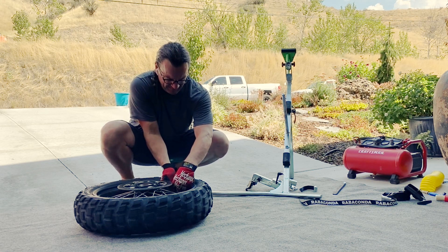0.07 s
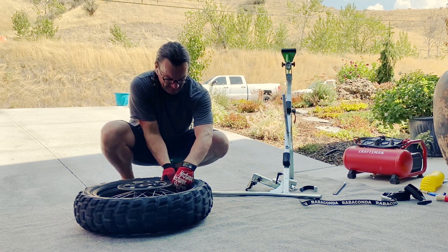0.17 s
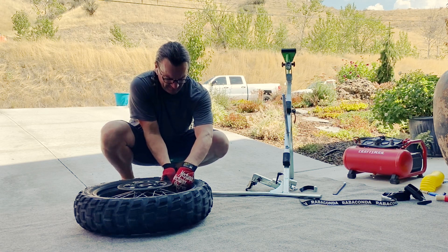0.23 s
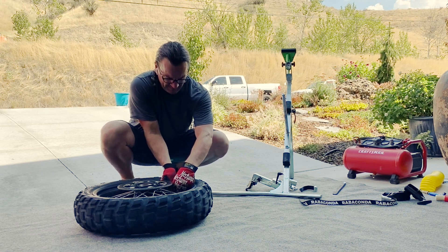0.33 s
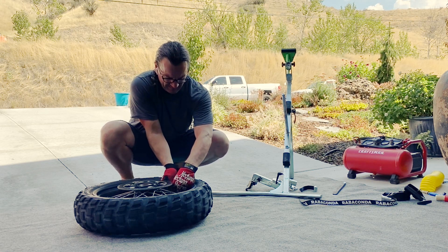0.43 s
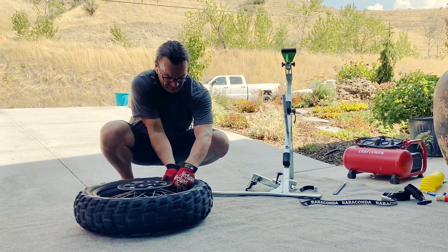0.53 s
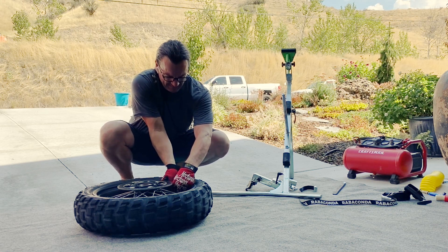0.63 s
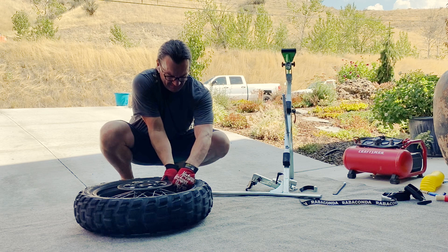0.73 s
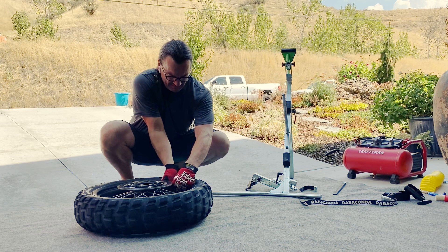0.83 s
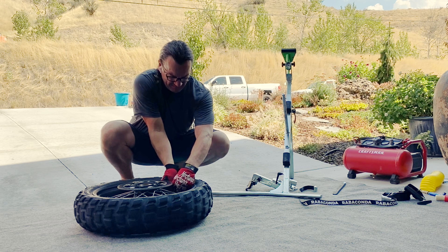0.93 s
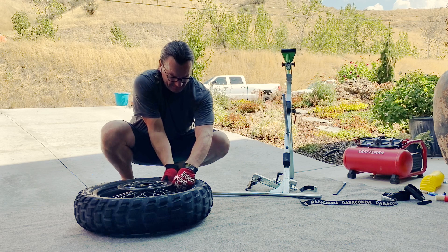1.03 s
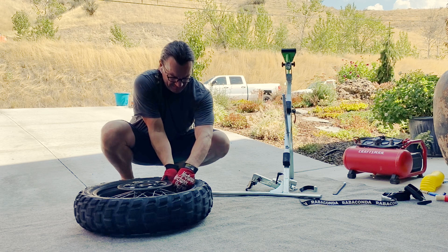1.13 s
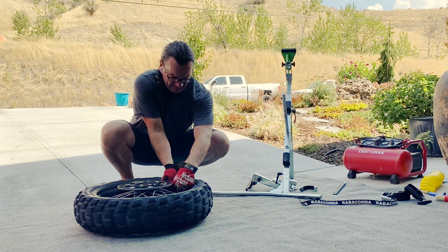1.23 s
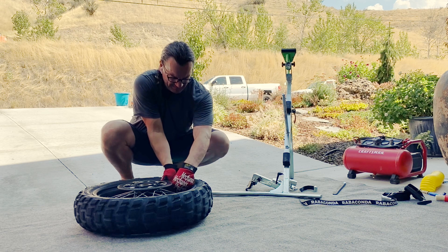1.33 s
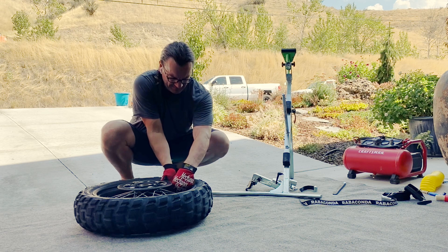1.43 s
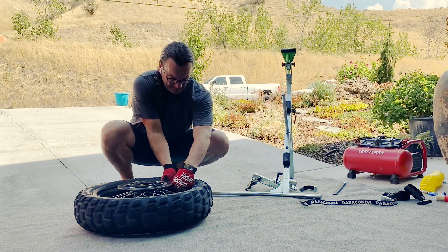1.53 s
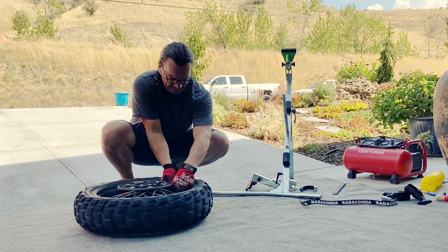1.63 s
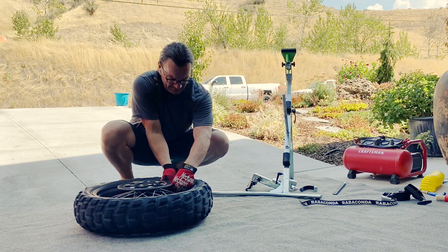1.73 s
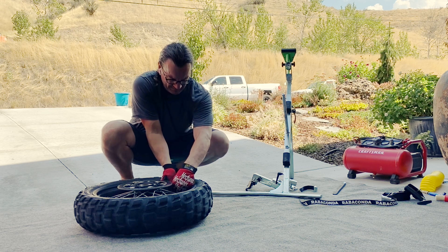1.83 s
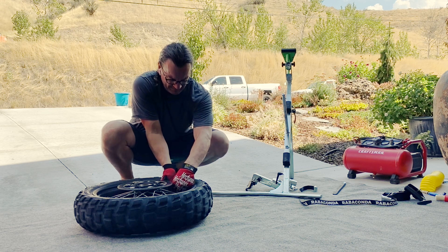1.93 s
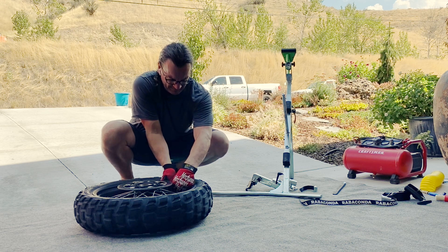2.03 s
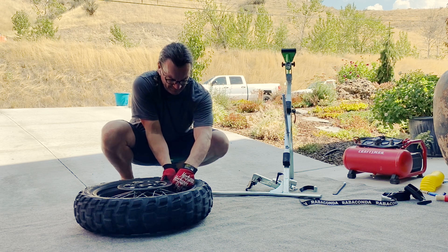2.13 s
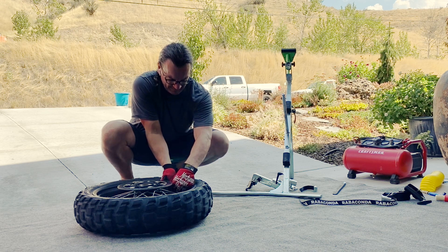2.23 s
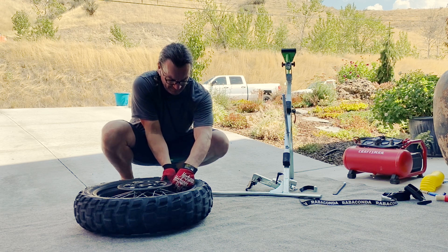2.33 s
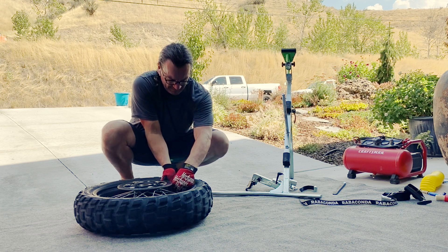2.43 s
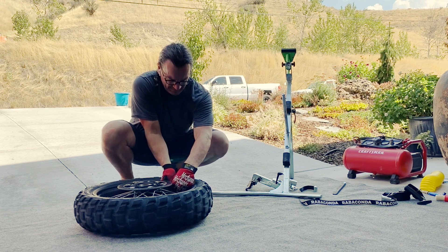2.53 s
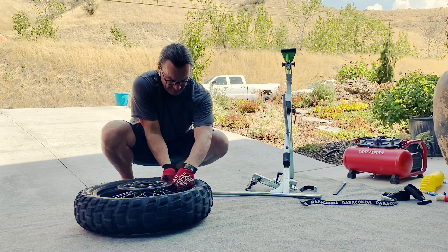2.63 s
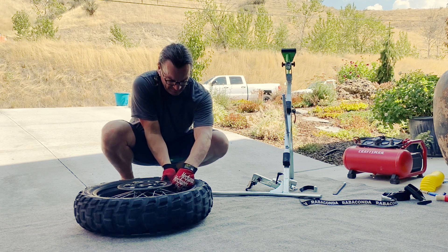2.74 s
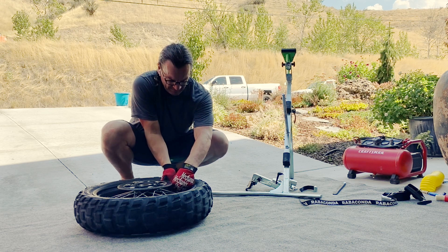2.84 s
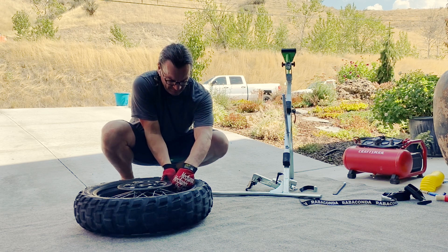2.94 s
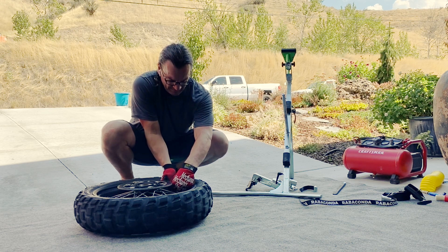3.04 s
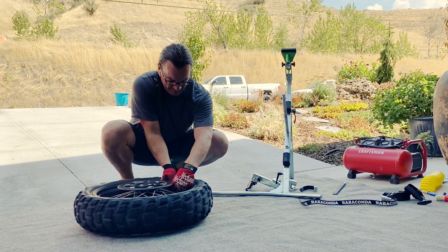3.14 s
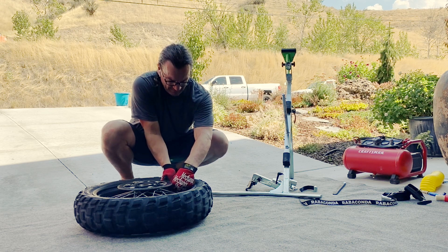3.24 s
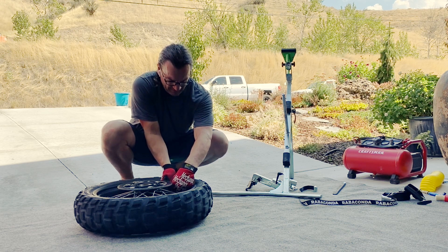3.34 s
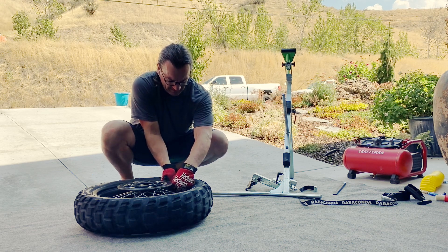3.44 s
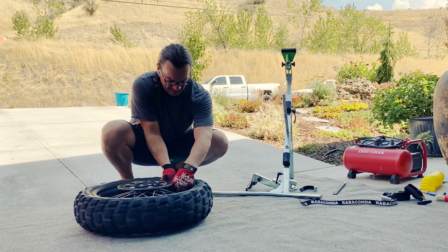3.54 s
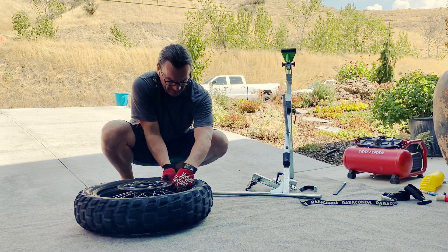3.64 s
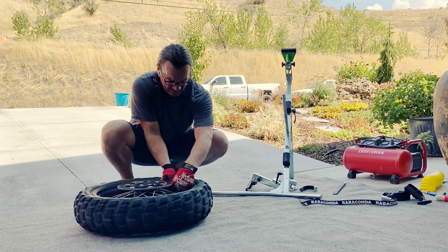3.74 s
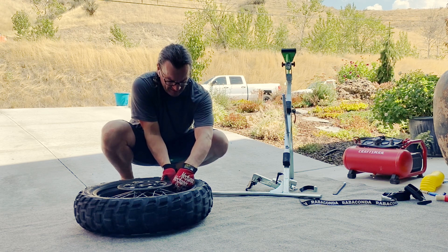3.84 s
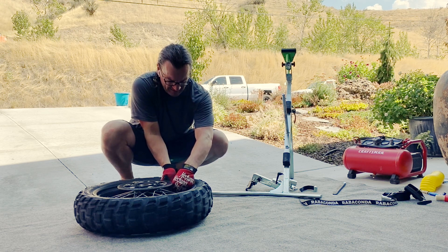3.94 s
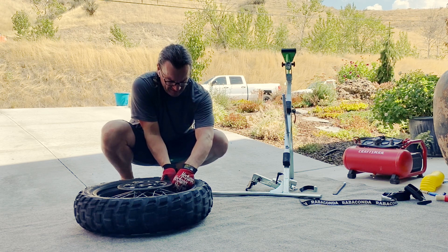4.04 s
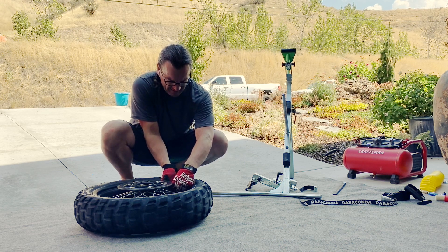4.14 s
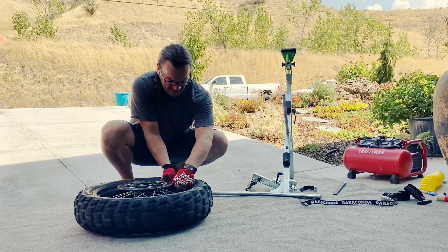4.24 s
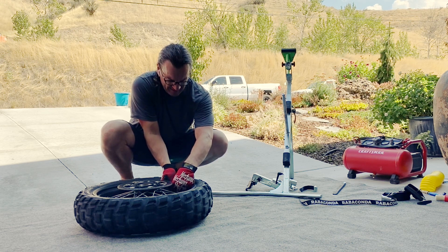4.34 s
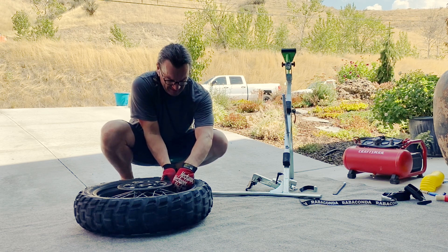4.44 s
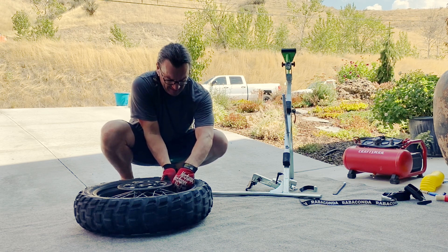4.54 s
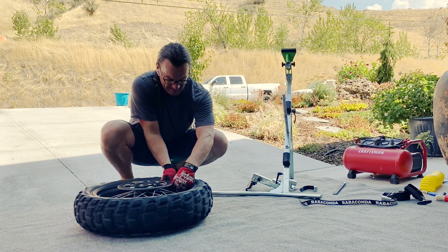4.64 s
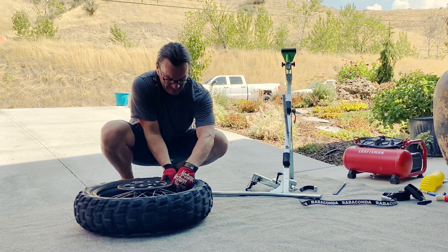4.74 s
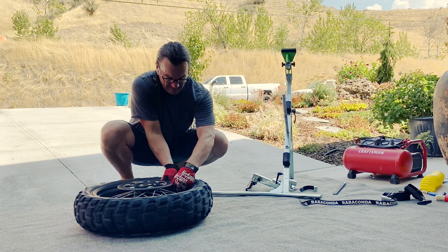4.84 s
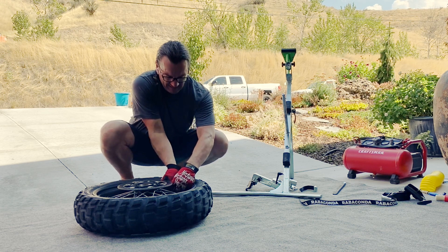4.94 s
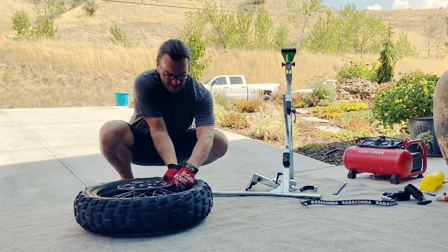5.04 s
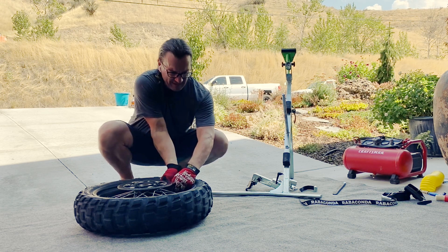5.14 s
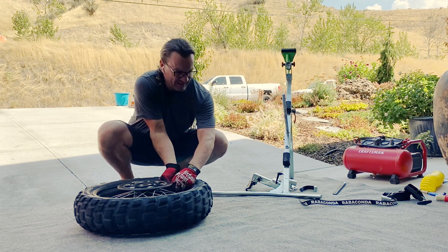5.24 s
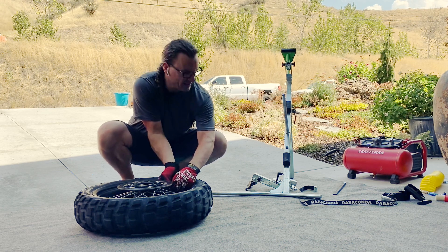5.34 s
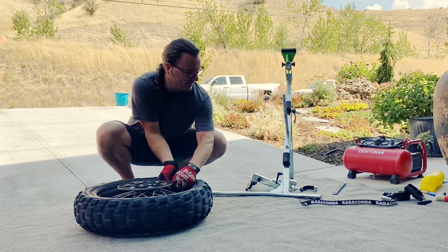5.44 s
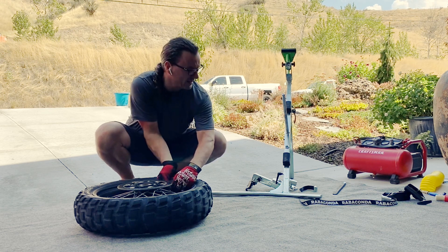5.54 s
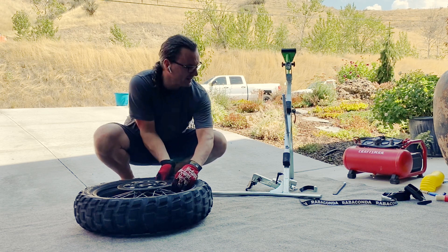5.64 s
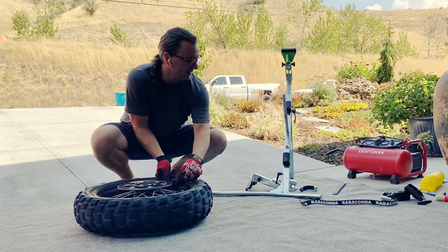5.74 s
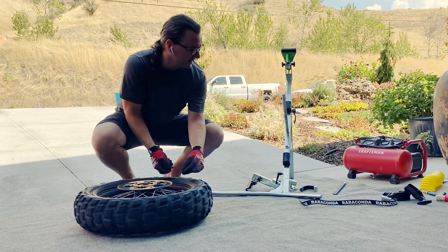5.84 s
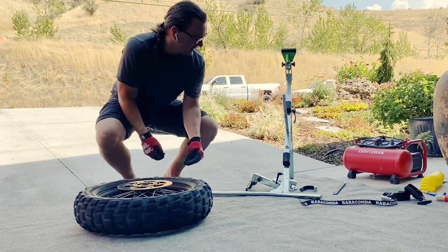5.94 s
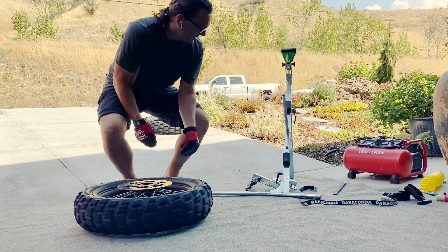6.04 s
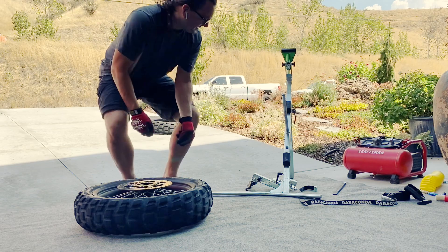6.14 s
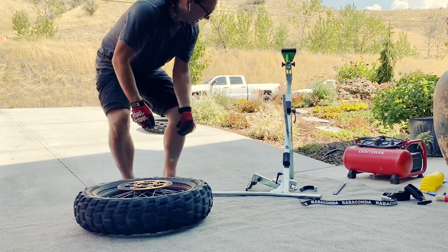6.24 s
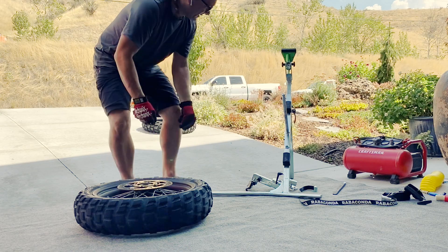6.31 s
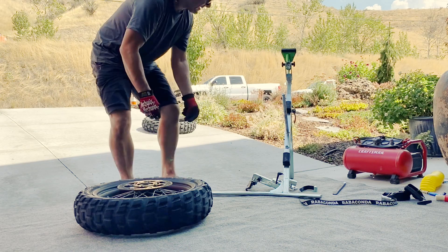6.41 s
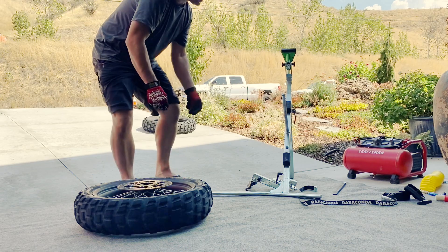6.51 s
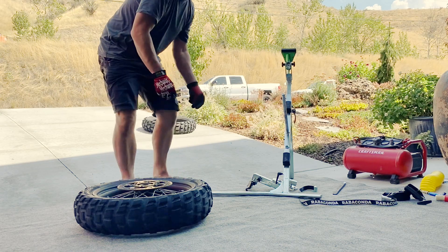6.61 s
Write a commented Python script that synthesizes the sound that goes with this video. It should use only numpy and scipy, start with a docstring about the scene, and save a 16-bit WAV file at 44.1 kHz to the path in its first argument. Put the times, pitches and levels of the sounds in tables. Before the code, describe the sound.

A quiet outdoor driveway, close stereo perspective: soft low air rumble and a faint distant engine droning around 65 to 75 hertz, rising and fading. From 0 to 1.5 seconds a very thin, high hiss seeps from a tire valve, with one tiny click near 0.7. Faint breathy surges follow between 1.6 and 3.5, some with a very high, airy whistle. Small tool clicks with short, dull metallic rings fall at about 2.6, 3.0, 3.5, 3.7 and 3.9. From 3.9 the puffs strengthen, with crisp spurts at 4.3, 4.6 and 4.75. A soft, low knock comes at 4.9 as the hiss swells quickly. After 5.1 a hollow roar joins, and around 5.4 the air blasts out at its loudest, bright and full. By 5.7 it eases to a strong, steady, slightly fluttering rush, continuing until the end at 6.7, with short reflections from concrete and garage walls.

```python
"""Air escapes from a motorcycle tire as the valve core is screwed out on a driveway, before an open garage.
It seeps past the thread, then spurts, then blows freely: shaped noise in three sizes of eddy, with a whistle.
A hollow roar of resonant noise joins from the open stem; tool clicks are noise bursts and ringing rim modes.
Outdoor air is soft noise. A close microphone pair spreads all this left and right.
An engine drones far away, two sines alike on both sides."""
import sys
import numpy as np
from scipy import signal
from scipy.fft import rfft, irfft, next_fast_len
from scipy.io import wavfile

SR = 44100
rng = np.random.default_rng(int(sys.argv[2]) if len(sys.argv) > 2 else 0)


def wrap_up_sound(samples):
    """Save the sound to the file named by the first command line argument, as 16-bit audio."""
    columns = np.atleast_2d(samples).T
    # keep every value between -1 and 1, then stretch to whole-number steps
    tamed = np.clip(columns, -1, 1)
    steps = np.round(tamed * 32767).astype(np.int16)
    wavfile.write(sys.argv[1], SR, steps)


N = 294147
TIME = np.arange(N) / SR
SIZE = next_fast_len(N + SR)
HZ = np.maximum(np.arange(SIZE // 2 + 1) * SR / SIZE, 1)


def from_db(db):
    """Decibels to gain."""
    return 10 ** (np.asarray(db) / 20)


def in_time(rows):
    """Every column of a time curve, interpolated at each sample."""
    s, *columns = np.transpose(rows)
    return [np.interp(TIME, s, column) for column in columns]


def over_hz(points):
    """A frequency curve, interpolated over log frequency."""
    hz, value = np.transpose(points)
    return np.interp(np.log(HZ), np.log(hz), value)


def peak_power(peaks):
    """Summed power response of a set of resonances."""
    return sum(from_db(db) ** 2 / (1 + (2 * (HZ - hz) / width) ** 2) for hz, width, db in peaks)


def resonant(peaks):
    """Gain of resonances standing out of a flat background."""
    return np.sqrt(1 + peak_power(peaks))


def below(edge_hz, order):
    """Share of power that a low-pass lets through."""
    return 1 / (1 + (HZ / edge_hz) ** (2 * order))


def noise(gain, band=(0, SR), count=3):
    """Coloured noise, rms 1 within the band; rows: direct, scattered to the left, to the right."""
    inside = (HZ >= band[0]) & (HZ <= band[1])
    band_rms = np.sqrt(np.mean((gain * inside) ** 2))
    white = rng.standard_normal((count, SIZE))
    return irfft(rfft(white) * gain / band_rms, SIZE)[:, :N]


def drift(rate_hz):
    """Slow random wander of rms 1."""
    return noise(1 / (1 + (HZ / rate_hz) ** 2), count=1)[0]


# colour of the outdoor air: pitch_hz [Hz], level_db [dB per Hz, relative]
AIR_COLOUR = [(20, -27), (34, -4), (55, -4.5), (110, -3), (170, -8.5), (260, -11), (500, -18), (1000, -29),
              (2500, -39), (12000, -45)]


def outdoor_air(level_db=-64.5):
    """Steady soft noise, strongest in the lows."""
    return from_db(level_db) * noise(from_db(over_hz(AIR_COLOUR)))


# speed of the distant engine: start_s [s], pitch_hz [firings per second, before the wander]
ENGINE_PITCH = [(0, 63.3), (1.3, 63.5), (1.7, 68), (3.6, 67.9), (4.1, 74.1), (6.67, 67.2)]
# its drone comes and goes: start_s [s], level_db [dB, before trim and waver]
ENGINE_LEVEL = [(0, -52), (.75, -63.5), (1.9, -60.5), (2.85, -66.5), (3.05, -72), (4.02, -68),
                (4.11, -56.5), (4.45, -64.5), (6.67, -62)]


def engine(trim_db=-0.1, waver_db=2.6, wander_hz=0.57, octave_db=-13):
    """Only the firing note and its octave carry this far; pitch and level wander."""
    (hz,), (level_db,) = in_time(ENGINE_PITCH), in_time(ENGINE_LEVEL)
    phase = 2 * np.pi * np.cumsum(hz + wander_hz * drift(8.3)) / SR
    drone = np.sin(phase) + from_db(octave_db) * np.sin(2 * phase)
    # sqrt(2) gives the firing note rms 1
    return np.sqrt(2) * from_db(level_db + trim_db + waver_db * drift(7.9)) * drone


def reflections(first_s=0.00315, t60_s=0.12):
    """Response of a short, dense train of echoes from concrete and garage walls; power 1."""
    t = TIME[:SR // 2]
    echoes = rng.standard_normal(len(t)) * from_db(-60 * t / t60_s) * (t > first_s)
    return rfft(echoes / np.linalg.norm(echoes), SIZE)


def scatter(x):
    """A sound with its echoes from the left and from the right."""
    sides = np.array([reflections(), reflections()])
    return np.array([x, *irfft(rfft(x, SIZE) * sides, SIZE)[:, :N]])


# tool clicks on the valve, the last row a dull thud of the tire: start_s [s], level_db [dB, before trims],
# bright_hz [Hz, softening edge]
CLICKS = [(0.659, -52.5, 1200), (2.613, -40, 600), (2.617, -54, 885), (2.957, -38.5, 6000),
          (2.9604, -41, 3030), (2.964, -47, 3000), (3.468, -38, 3000), (3.472, -34, 1500),
          (3.475, -34, 700), (3.672, -43, 600), (3.867, -34, 800), (4.926, -23, 90)]
# ring of the stem in the rim: pitch_hz [Hz], level_db [dB re click], t60_s [s]
RIM_MODES = [(95, -19, 0.099), (174, -18.5, 0.12), (300, -18, 0.048), (414, -3, 0.017), (553, -7, 0.033),
             (875, -10.5, 0.031), (1160, -5, 0.015), (1410, -10, 0.0093), (2210, -9, 0.015),
             (2770, -7, 0.02), (3370, -1, 0.0057), (4280, -6, .012)]


def tool(ring_db=-3.5, scatter_db=2.0, crack_db=-3, crack_s=0.0028):
    """Each slip gives a dry noise crack and knocks the rim's modes; soft contacts weaken the highs."""
    start_s, click_db, bright_hz = np.transpose(CLICKS)
    ring = np.zeros(N)
    for k, (hz, mode_db, t60_s) in enumerate(RIM_MODES):
        # each click strikes each mode a little differently
        knock_db = click_db + mode_db + scatter_db * rng.standard_normal(len(start_s))
        knocks = np.zeros(N)
        knocks[(start_s * SR).astype(int)] = from_db(knock_db) / np.hypot(1, hz / bright_hz)
        r, w = from_db(-60 / (t60_s * SR)), 2 * np.pi * hz / SR
        mode = signal.lfilter([0, np.sin(w)], [1, -2 * r * np.cos(w), r * r], knocks + 1e-18)
        ring += (-1) ** k * mode  # neighbouring modes in opposite polarity
    out = from_db(ring_db) * ring
    t = TIME[:SR // 20]
    for start, db, edge_hz in CLICKS:
        burst = from_db(db + crack_db) * rng.standard_normal(len(t)) * np.exp(-t / crack_s)
        first = int(start * SR)
        soften = signal.butter(1, min(edge_hz, SR / 3), fs=SR)
        out[first:first + len(t)] += signal.lfilter(*soften, burst)
    return out


# roar of the open stem: start_s [s], level_db [dB, before trim and fade-in]
ROAR_LEVEL = [(5.12, -43), (5.255, -29), (5.3, -36.5), (5.395, -27.5), (5.524, -38.5), (5.585, -30),
              (6.67, -35.5)]
# colour of the roar: pitch_hz [Hz], level_db [dB per Hz, relative]
ROAR_COLOUR = [(30, -30), (70, -23), (120, -18), (190, -10), (320, -6), (400, -5), (480, 1), (580, -4),
               (630, -9.5), (850, -16), (930, -24.5), (1600, -52)]
# resonances of stem and tire: pitch_hz [Hz], width_hz [Hz], level_db [dB over the roar]
HOLLOW_PEAKS = [(286, 6.9, 0.5), (323, 18, 0), (510, 23, -19), (585, 42, 8), (853, 37, 7.5)]


def roar(trim_db=0.75, opening_s=0.32):
    """As the core comes out, the full stream stirs the hollow resonances of the stem."""
    roar_db, = in_time(ROAR_LEVEL)
    opened = np.clip((TIME - ROAR_LEVEL[0][0]) / opening_s, 0, 1)
    stream = noise(from_db(over_hz(ROAR_COLOUR)) * resonant(HOLLOW_PEAKS), (250, 700))
    return opened * stream * from_db(roar_db + trim_db)


def surge(start, length, attack_s=0.034, release_s=0.03):
    """Envelope of one surge: it swells, holds, then dies by 1/e in each release time."""
    swell = np.clip((TIME - start) / attack_s, 0, 1)
    return swell * np.exp(-np.maximum(TIME - start - length, 0) / release_s)


# each turn of the tool lets a surge of air by: start_s [s], length_s [s, up to the release],
# hiss_db, rush_db, coarse_db [dB, before the jet's trims], whistle_share [0-1]
SURGES = [(1.616, 0.1, -60, -67, -89, 0), (1.913, 0.16, -61.5, -68, -76.5, 0),
          (2.278, 0.27, -68, -71, -92, 0), (2.458, 0.039, -59, -64, -86, 0),
          (2.61, 0.39, -68, -87, -92, .6), (3.193, 0.28, -59.5, -62.5, -72, 0.9),
          (3.907, 0.16, -53, -59, -62.5, 0), (4.218, 0.061, -52, -62, -63, 0),
          (4.276, 0.045, -42.5, -55, -55, 0), (4.304, .11, -37, -40.5, -43, 0),
          (4.613, 0.033, -38.5, -55, -50, 0), (4.707, 0.045, -37, -45.5, -45.5, 0),
          (4.766, .1, -39.5, -51.5, -62, 0), (4.899, 0.062, -31, -39.5, -45.5, 0),
          (4.993, 0.046, -50, -40, -46.5, 0), (5.075, 0.21, -29.5, -46, -54, 0),
          (5.388, .08, -26.5, -27.5, -39.5, 0), (5.545, 0.072, -37, -28.5, -54, 0.1)]
# breathy whistle at the thread: pitch_hz [Hz], width_hz [Hz], level_db [dB, relative]
WHISTLE_PEAKS = [(6620, 180, -15), (11250, 400, 2), (11620, 120, -4), (12400, 260, 5), (13500, 500, -14)]


def whistle(level_db=-55.5):
    """During some surges the narrow gap almost sings: noise through resonances alone."""
    singing = sum(np.clip(share, 0, 1) * surge(start, length) for start, length, *_, share in SURGES)
    return from_db(level_db) * singing * noise(np.sqrt(peak_power(WHISTLE_PEAKS)))


# steady leak, growing as the core backs out and sagging as the tire empties:
# start_s [s], hiss_db, coarse_db [dB, before the jet's trims]
LEAK = [(0, -60, -72.5), (.53, -54, -77.5), (.8, -59, -79), (1.5, -60.5, -80.5), (2.05, -62.5, -73.5),
        (3.6, -60.5, -74.5), (3.84, -65, -77.5), (3.88, -56, -72), (4.2, -58.5, -73.5), (4.47, -45, -63),
        (4.61, -47.5, -65.5), (4.69, -43, -53.5), (4.9, -41.5, -53.5), (4.98, -33, -46.5),
        (5.12, -30, -47.5), (5.35, -20, -34), (5.68, -29.5, -44), (6.67, -32.5, -49)]


def airflow(rush_db=-5.0, rush_follows=0.97, trickle_db=-60, spill_db=3):
    """Levels of hiss, rush and coarse turbulence: surges add their power to the steady leak."""
    hiss_db, coarse_db = in_time(LEAK)
    # the leak's rush follows both its hiss and its coarse turbulence
    from_hiss = from_db(trickle_db + rush_db + rush_follows * (hiss_db - trickle_db))
    rush = np.hypot(from_hiss, from_db(coarse_db + spill_db))
    power = np.array([from_db(hiss_db), rush, from_db(coarse_db)]) ** 2
    for start, length, *levels_db, _ in SURGES:
        power = power + np.outer(from_db(levels_db), surge(start, length)) ** 2
    return 10 * np.log10(power)


def eddies(colour, peaks, coarse_db, rush_db, hiss_db, coarse_hz=2100, fine_hz=8600):
    """Large, middling and small eddies sound low, middle and high through the gap's resonances."""
    gain = from_db(over_hz(colour)) * resonant(peaks)
    large, not_small = below(coarse_hz, order=5), below(fine_hz, order=7)
    coarse = noise(gain * np.sqrt(large), (800, 2000))
    rush = noise(gain * np.sqrt((1 - large) * not_small), (2500, 8000))
    hiss = noise(gain * np.sqrt(1 - not_small), (9000, 15500))
    return coarse * from_db(coarse_db) + rush * from_db(rush_db) + hiss * from_db(hiss_db)


# colour of air seeping past the thread, puffing past the loose core, and blowing as a jet:
# pitch_hz [Hz], level_db [dB per Hz, relative]
SEEP_COLOUR = [(100, 3), (500, -4), (1000, -7.5), (1300, -5), (1800, -8.5), (2200, -2.5), (4200, -2.5),
               (6000, -2.5), (7400, 1), (8300, -3.5), (10500, -3), (12600, -1), (16000, -1)]
PUFF_COLOUR = [(30, -34), (130, -10.5), (230, -6), (400, 2), (560, 6.5), (700, -1), (1000, -5), (1800, -3),
               (2400, 3), (3400, 6), (6500, 5), (8200, -2.5), (12600, -2), (16000, -3)]
JET_COLOUR = [(25, -34), (60, -9.5), (160, -9.5), (300, -6), (540, 3), (700, -3), (1250, 0), (1750, -5.5),
              (2100, -1.5), (4500, 2), (8200, -0.5), (9700, 0.5), (13000, 3), (16000, 1)]
# resonances of the gap while seeping and puffing, narrow ones of the valve bore, broad ones of the
# empty stem: pitch_hz [Hz], width_hz [Hz], level_db [dB over the flat background]
SEEP_PEAKS = [(3440, 230, 2), (5000, 390, 2.5), (6470, 150, 6), (6880, 160, 4.5), (9050, 70, -1),
              (9170, 120, 2), (10200, 130, 0), (11400, 160, -2), (12500, 150, 4), (12750, 180, 4),
              (13550, 130, 3), (13920, 110, -2)]
PUFF_PEAKS = [(844, 57, 7.5), (1190, 100, 4.5), (1430, 99, 2.5), (2350, 350, 2), (2900, 224, -0.5),
              (4500, 30, 8.5), (4970, 220, 3), (6650, 480, 2), (10400, 110, -9), (12500, 170, 6),
              (14500, 160, 6)]
BORE_PEAKS = [(2120, 49, -11), (2620, 36, 5), (3330, 26, -1), (4860, 44, 4), (6750, 53, 10), (7030, 280, 5),
              (7600, 200, -3), (8450, 33, -4), (9710, 100, 3.5), (10200, 52, -11), (11960, 70, 0),
              (13300, 60, 3)]
OPEN_PEAKS = [(4970, 520, 0.5), (5710, 110, -3), (6550, 830, 2), (9500, 170, 2), (10040, 190, 0),
              (12000, 230, 2), (13700, 150, 0)]


def jet(loose_s=3.87, wide_s=4.66, out_s=5.6, change_s=0.082, flutter_db=0.5, sputter_db=0.84):
    """The gap changes shape three times as the core backs out; the large eddies sputter most."""
    hiss_db, rush_db, coarse_db = airflow()
    coarse_db = coarse_db + sputter_db * drift(30)
    # crossfades in power, centred on each change
    loose, wide, out = (np.clip((TIME - s) / change_s + .5, 0, 1) for s in (loose_s, wide_s, out_s))
    seep = eddies(SEEP_COLOUR, SEEP_PEAKS, coarse_db - 0.7, rush_db + 0.17, hiss_db - 0.6)
    puff = eddies(PUFF_COLOUR, PUFF_PEAKS, coarse_db - 0.3, rush_db + 1.7, hiss_db - 0.3)
    spurt = eddies(JET_COLOUR, BORE_PEAKS, coarse_db - 0.3, rush_db - 0.8, hiss_db + 0.1)
    stream = eddies(JET_COLOUR, OPEN_PEAKS, coarse_db - 0.1, rush_db - 0.7, hiss_db - 0.3)
    early = np.sqrt(1 - loose) * seep + np.sqrt(loose * (1 - wide)) * puff
    late = np.sqrt(wide * (1 - out)) * spurt + np.sqrt(out) * stream
    return (early + late) * from_db(flutter_db * drift(35))


# phase between the microphones: pitch_hz [Hz], lead_rad [radians by which left leads]
LEAD = [(50, 0), (600, .15), (1350, .5), (2100, 0), (2750, -.05), (3300, -.65), (4400, -.55), (5100, -1.1),
        (5900, -2.9), (6700, -1.4), (7900, -2.15), (9300, -1.5), (10300, -1.05), (12000, 0)]
# level between them: pitch_hz [Hz], lean_db [dB, left over right]
LEAN = [(70, .5), (250, 2.7), (850, 3.7), (1600, 1), (2400, .2), (3200, 1.4), (4400, -1.8), (5650, -4.9),
        (6050, -2.5), (6600, -3.4), (7200, -2.3), (8800, -1.5), (11500, 0)]
# scattered sound: pitch_hz [Hz], diffuse_share [share of power, 0-1]
DIFFUSE = [(60, .03), (250, .07), (650, .15), (1050, .55), (1650, .46), (2400, .1), (3300, .46),
           (4700, .42), (6200, .6), (6700, .3), (9500, .25), (10700, .25), (11700, .07), (12300, .001)]


def microphones(x, garage_db=-11):
    """Direct sound reaches the two ports with a lead and a lean; scattered sound differs between them."""
    sides = np.array([[1], [-1]])
    diffuse = np.clip(over_hz(DIFFUSE), 0, 1)
    lean = from_db(sides * over_hz(LEAN) / 2)
    direct = np.sqrt(1 - diffuse) * lean * np.exp(1j * sides * over_hz(LEAD) / 2)
    # evens out the response of the pair's sum
    even = np.sqrt(np.abs(direct.mean(axis=0)) ** 2 + diffuse / 2)
    garage = (1 + from_db(garage_db) * reflections()) / np.hypot(1, from_db(garage_db))
    sound = rfft(x, SIZE)
    near = sound[0] * garage * direct
    scattered = sound[1:] * np.sqrt(diffuse) * lean
    return irfft((near + scattered) / even, SIZE)[:, :N]


def scene():
    """The valve close by and the outdoor air through the microphone pair, plus the far engine."""
    valve = jet() + whistle() + roar() + scatter(tool())
    return microphones(outdoor_air() + valve) + engine()


def record(dry, cutoff_hz=15750):
    """A steep low-pass cuts the top."""
    return signal.sosfilt(signal.ellip(12, .1, 80, cutoff_hz, fs=SR, output="sos"), dry)


dry = scene()
out = record(dry)
wrap_up_sound(out)
```